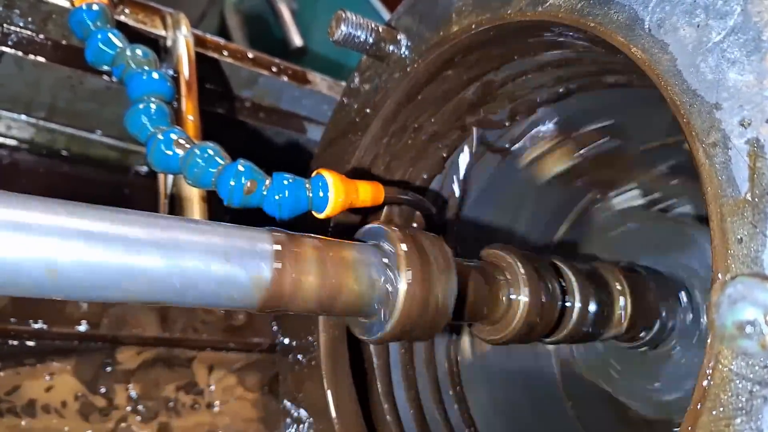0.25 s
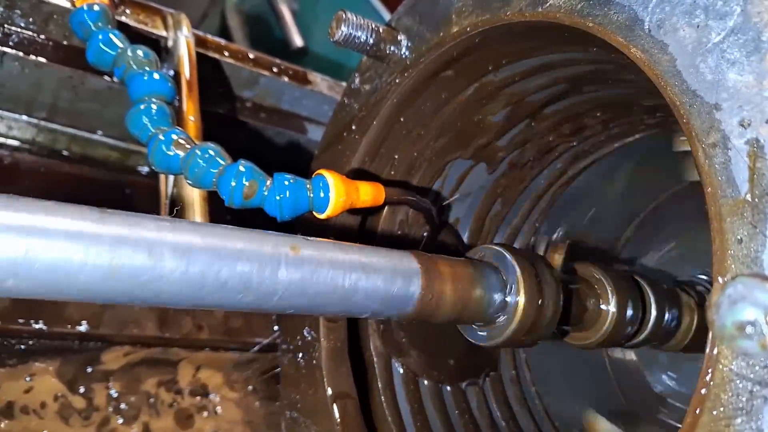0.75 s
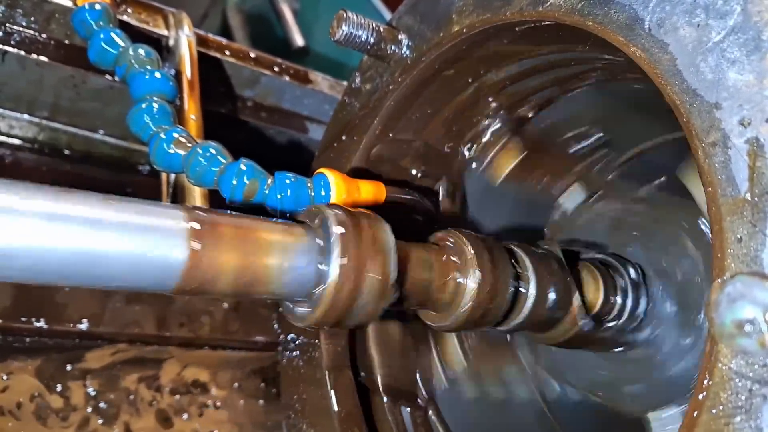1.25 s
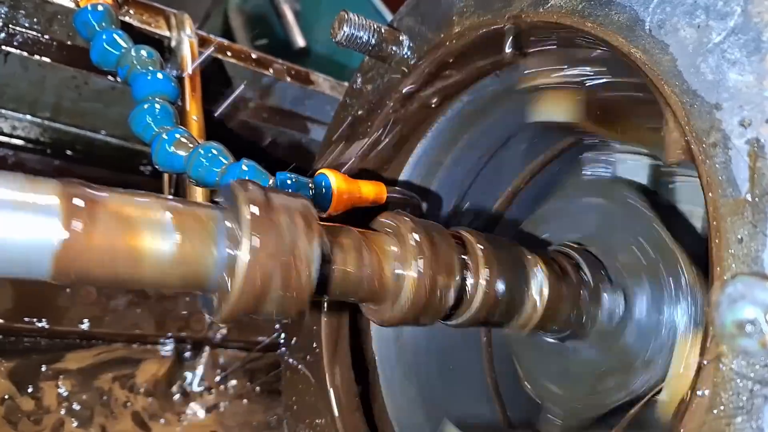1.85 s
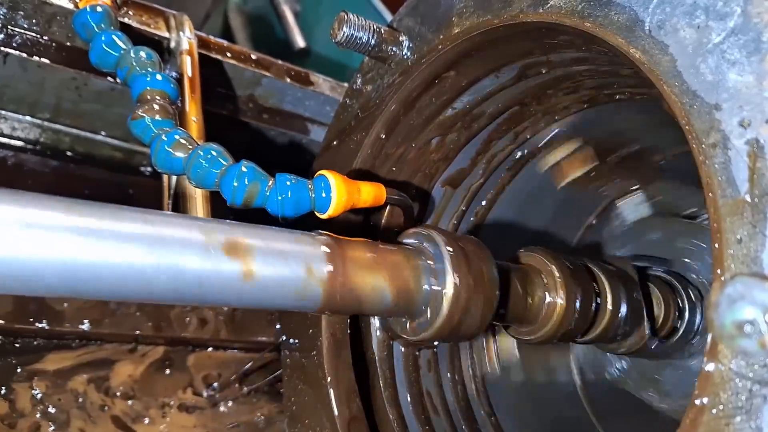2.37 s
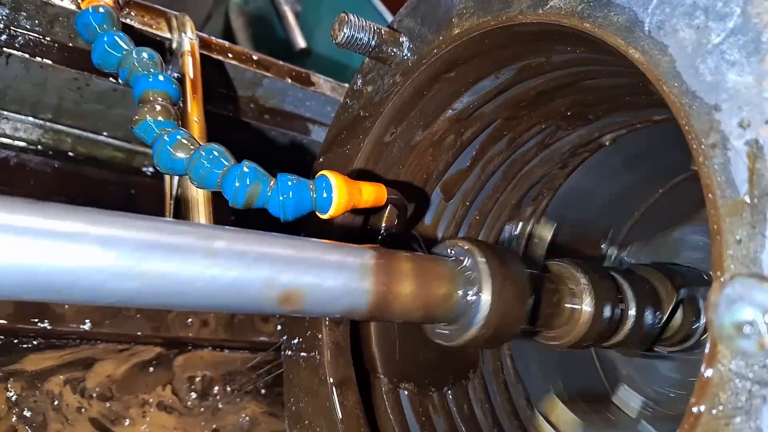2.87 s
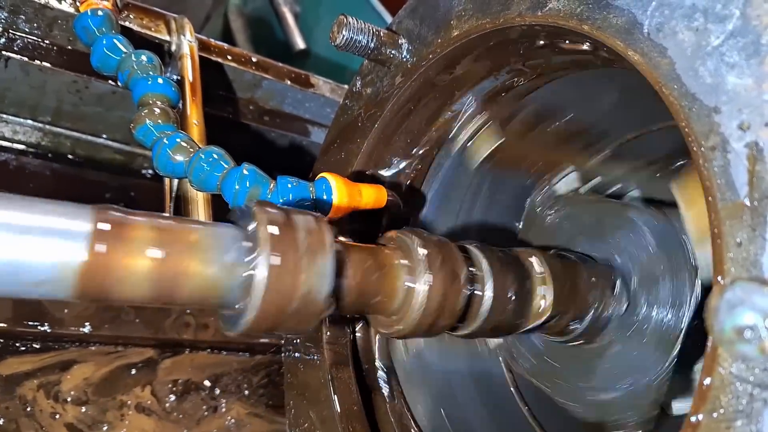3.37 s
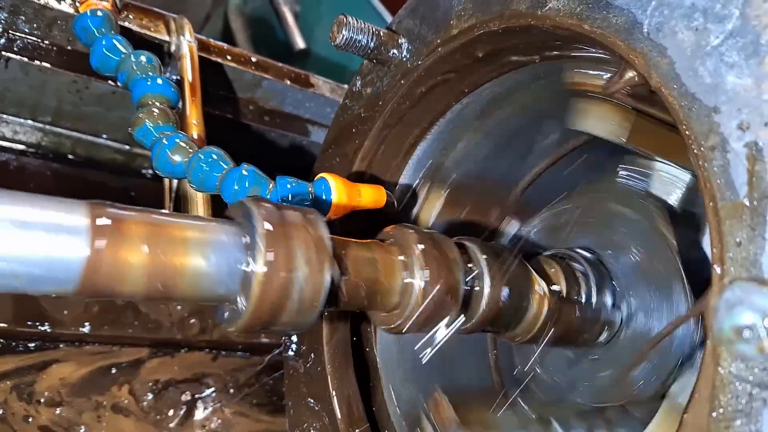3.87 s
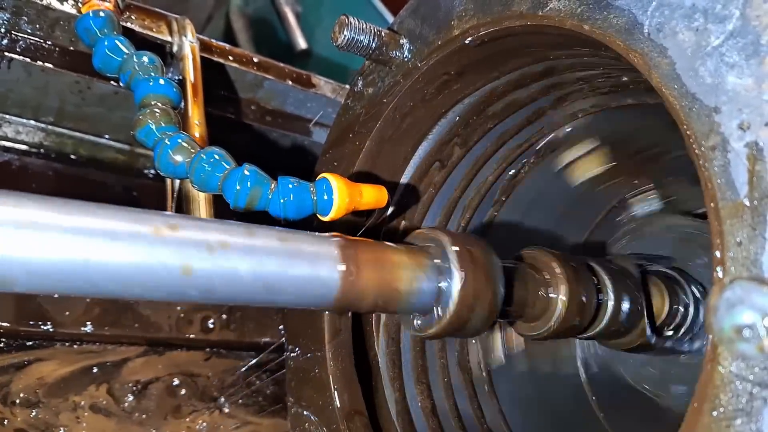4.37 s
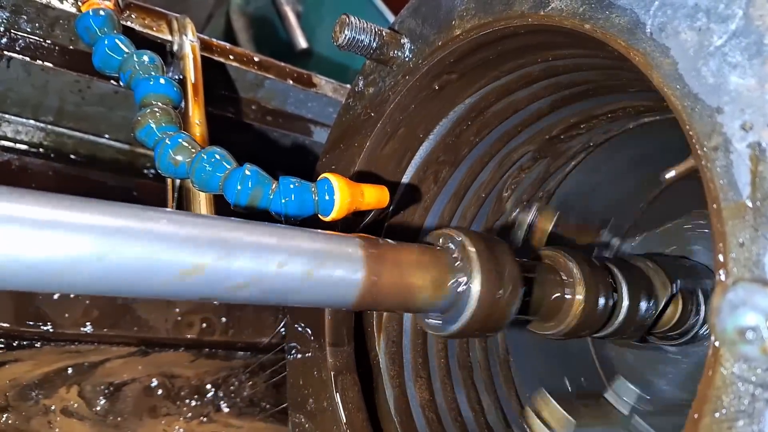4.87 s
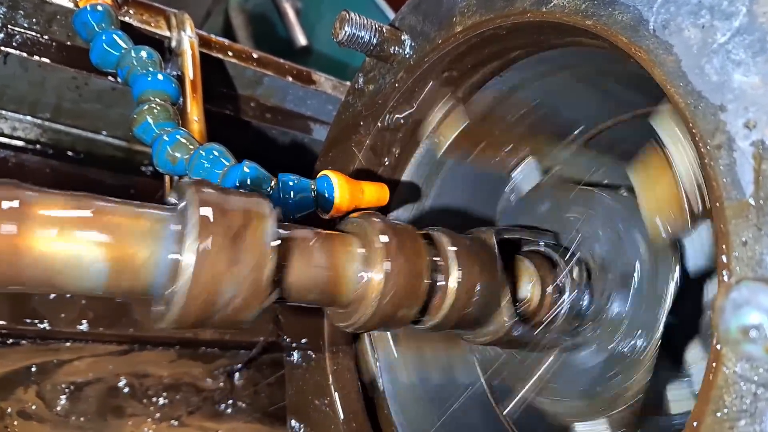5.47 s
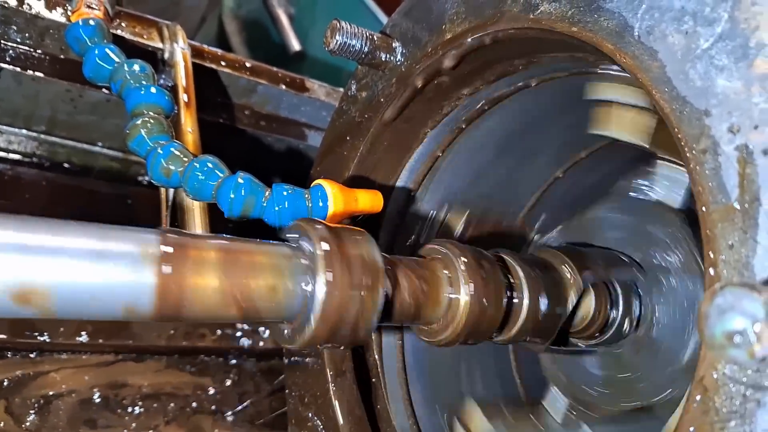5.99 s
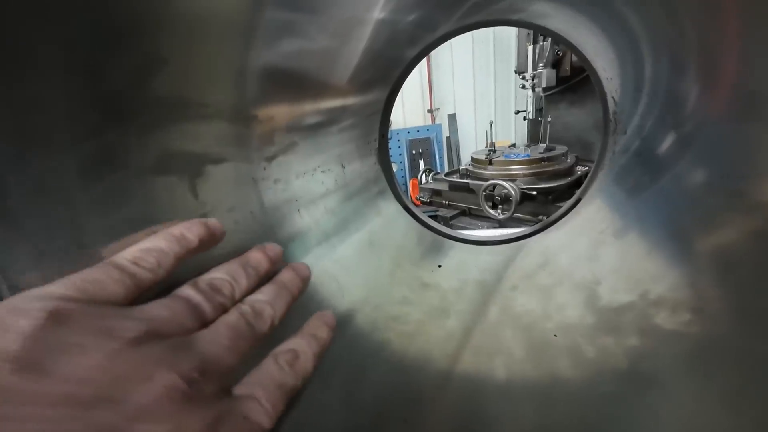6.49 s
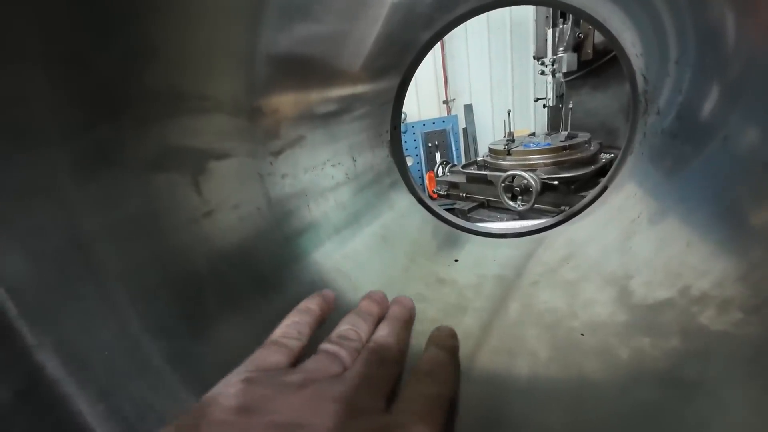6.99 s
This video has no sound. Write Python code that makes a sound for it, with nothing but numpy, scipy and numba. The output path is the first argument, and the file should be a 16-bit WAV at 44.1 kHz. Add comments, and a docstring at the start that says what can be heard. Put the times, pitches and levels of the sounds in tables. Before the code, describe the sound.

A steady mains-like motor hum sits under dense wet grinding noise and a thin high valve hiss, heard very close and wide. Each reversal clunks through the frame; stone holders tick and scrape, joints knock dully, oil spatters. Another machine's drone and rising whine end after a second and a half. Finally a hard cut leaves soft distant room murmur and a brief airy skin swish, in mono.

```python
"""Machine shop: a hone spins and strokes in an oil-flooded iron cylinder, heard close by on two microphone ports.
The motor hums at twice the mains; grit and oil are banded noise that also rings cylinder and frame.
The stroke valve hisses as narrow noise and clunks at reversals; loose parts tick and knock as ringing modes.
A neighbouring machine drones, whines and stops. Then a cut to the quiet shop, in mono:
fingertips slide along the finished bore, as resonant noise over a distant murmur."""
import sys
import numpy as np
from scipy import signal
from scipy.fft import rfft, irfft, next_fast_len
from scipy.io import wavfile
from scipy.ndimage import uniform_filter1d
from numba import njit

SR = 44100
rng = np.random.default_rng(int(sys.argv[2]) if len(sys.argv) > 2 else 0)


def store_pcm(level_fs):
    """Save levels as 16-bit WAV."""
    pcm = np.round(np.clip(level_fs, -1, 1) * 32767).astype(np.int16)
    wavfile.write(sys.argv[1], SR, np.atleast_2d(pcm).T)


N = 319264
T = np.arange(N) / SR
M = next_fast_len(N)
F = np.fft.rfftfreq(M, 1 / SR)
CUT_S = 6.110
LOW_PAN_DB = 4.4  # left minus right, for hum, drone, whine and rumble


def undb(db):
    """Amplitude factor of a level in dB."""
    return 10 ** (np.asarray(db) / 20)


def curves(table):
    """Columns against time, straight between rows."""
    s, *columns = np.transpose(table)
    return [np.interp(T, s, c) for c in columns]


def spectra(table):
    """Columns against log frequency, straight between rows."""
    hz, *columns = np.transpose(table)
    return [np.interp(np.log(F + 1), np.log(hz), c) for c in columns]


def unit(x):
    """Scale to rms 1."""
    return x / np.sqrt(np.mean(x ** 2))


def walk(rate_hz):
    """Random levels held 1 / rate_hz and slewed twice, rms 1."""
    hold = int(SR / rate_hz)
    steps = np.repeat(rng.standard_normal(N // hold + 1), hold)
    slewed = uniform_filter1d(uniform_filter1d(steps, hold), hold)
    return unit(slewed[:N])


@njit
def svf(x, hz, width_hz):
    """State-variable band-pass with a moving centre and width, gain 1 at the centre."""
    y, band, low = np.empty(len(x)), 0., 0.
    for i in range(len(x)):
        g = np.tan(np.pi * hz[i] / SR)
        damping = width_hz[i] / hz[i]
        v = (band + g * (x[i] - low)) / (1 + g * (g + damping))
        band = 2 * v - band
        low = low + 2 * g * v
        y[i] = damping * v
    return y


def rung(hz, width_hz):
    """Noise through one resonance, rms 1."""
    return unit(svf(rng.standard_normal(N), hz + 0 * T, width_hz + 0 * T))


def tone(hz, waver_rad, rate_hz):
    """Sine with a wandering phase, rms 1."""
    return np.sqrt(2) * np.sin(2 * np.pi * hz * T + waver_rad * walk(rate_hz))


def ports(x, left_db, right_db):
    """Levels at the two ports, without lag."""
    return undb([[left_db], [right_db]]) * x


def panned(x, pan_db):
    """Both ports, left minus right = pan_db."""
    return ports(x, pan_db / 2, -pan_db / 2)


def late(hz):
    """Phase turn at the right port: long waves reach both together, short ones the left first."""
    lag_s = 24 / 44100  # in full from 1300 Hz up
    return np.exp(-2j * np.pi * hz * lag_s * np.clip(hz / 1300, 0, 1) ** 2)


def stroke():
    """Hum dB, hum phase rad, rasp dB and hiss dB over one stroke in and out, repeated."""
    period_s, at_mouth_s = 1.975, 1.646
    # Each row: seconds after turning at the mouth, hum in dB, hum phase in rad, rasp swing in dB,
    # hiss swing in dB.
    stroke_points = [(0, -19.5, -0.026, 1.5, .5), (.25, -20.5, -0.076, -0.5, -1),
                     (.37, -24, 0.0024, -2, -1.5), (.5, -23.5, -0.025, -1, -1.5),
                     (.62, -23.5, 0.36, -1.5, -1.5), (.76, -28, 0.9, -2, -2), (.93, -25.5, 0.26, -1, -1),
                     (1.05, -27, 0.3, 1.5, 0), (1.15, -26.5, .1, 0, -0.5), (1.3, -27, -0.38, -0.5, -1),
                     (1.42, -28, 1, -1.5, -0.5), (1.55, -27.5, 0.39, -1, -1.5),
                     (1.7, -24.5, 0.43, -1, -0.5), (1.79, -21, -0.14, -.5, -.5)]
    s, *columns = np.transpose(stroke_points)
    return [np.interp(T - at_mouth_s, s, c, period=period_s) for c in columns]


def add(out, s, peak_db, modes, rattle_s, rattle, pan_db):
    """A blow, then bounces of independent strength at each port, ring (Hz, dB, t60 s, rise s) modes."""
    bounces_per_s = 500
    t = T[:SR // 3]
    bounces = rng.random(len(t)) < bounces_per_s / SR
    blow = bounces * rng.standard_normal((2, len(t))) * np.exp(-t / rattle_s)
    blow *= rattle / np.sqrt(rattle_s * bounces_per_s / 2)
    blow[:, 0] = 1
    ring = 0
    for hz, db, t60_s, rise_s in modes:
        envelope = (1 - np.exp(-t / rise_s)) * 1000 ** (-t / t60_s)
        ring = ring + undb(db) * envelope * np.sin(2 * np.pi * hz * t + rng.standard_normal())
    x = signal.fftconvolve(blow, ring[None], axes=1)[:, :len(t)]
    x = undb(peak_db) * x / np.abs(x).max()
    i = int(s * SR)
    out[:, i:i + len(t)] += panned(x, pan_db)


def motor():
    """Magnetic hum, louder with the head near the mouth; the fundamental shakes once a rotor turn."""
    hum_hz, start_rad = 120.04, .7
    rotor_hz, rotor_depth, waver = 26.7, .07, .06
    grows_db_per_s, wander_db, dip_s = .3, .8, .018
    # Each row: multiple of the hum, mean level in dB against the fundamental.
    overtones = [(2, -20.5), (3, -31), (4, -34)]
    # Brief dips on the way out. Each row: centre in seconds, depth in dB.
    dips = [(1.025, -16), (3.03, -12), (5.005, -10)]
    hum_db, turn_rad = stroke()[:2]
    hum_db = hum_db + grows_db_per_s * (T - CUT_S / 2) + wander_db * walk(9)
    for s, depth_db in dips:
        hum_db = hum_db + depth_db * np.exp(-((T - s) / dip_s) ** 2)
    phase = 2 * np.pi * hum_hz * T + start_rad + turn_rad + 0.08 * walk(8)
    depth = rotor_depth * (1 + .5 * walk(2.37))
    shake = 1 + depth * np.sin(2 * np.pi * rotor_hz * T) + waver * walk(30)
    hum = np.sin(phase) * shake
    for k, db in overtones:
        hum = hum + undb(db + 1.6 * walk(8)) * np.sin(k * phase)
    return panned(np.sqrt(2) * undb(hum_db) * hum, LOW_PAN_DB)


def neighbour():
    """Another machine winds down: its drone sags while a whine grows, then all stops; a low rumble fades later."""
    drone_hz, drone_start_db, sag_from_s, sag_db_per_s = 73.4, -34, 0.89, -16
    whine_hz, idle_db, whine_from_s, whine_start_db, whine_db_per_s = 209.8, -46.5, 0.86, -40, 6.5
    murmur_hz, murmur_width_hz, murmur_db, murmur_pan_db = 444, 530, -41.5, -2
    stops_s, stop_fade_s = 1.47, 0.067
    rumble_hz, rumble_width_hz, rumble_db, rumble_ends_s, rumble_fade_s = 48, 20, -47, 3.0, .3
    # Steady lines in the murmur. Each row: frequency in Hz, level in dB.
    lines = [(283, -50), (390, -52), (510, -49)]
    drone_db = drone_start_db + sag_db_per_s * np.maximum(T - sag_from_s, 0)
    growing_db = whine_start_db + whine_db_per_s * (T - whine_from_s)
    whine_db = uniform_filter1d(np.where(T < whine_from_s, idle_db, growing_db), SR // 20)
    drone = undb(drone_db) * tone(drone_hz, .15, 5.2)
    whine = undb(whine_db) * tone(whine_hz, .15, 5.0)
    murmur = undb(murmur_db) * rung(murmur_hz, murmur_width_hz)
    for hz, db in lines:
        murmur += undb(db) * tone(hz, .3, 6)
    rumble = undb(rumble_db) * rung(rumble_hz, rumble_width_hz)
    rumble *= np.clip((rumble_ends_s - T) / rumble_fade_s, 0, 1)
    running = np.clip((stops_s - T) / stop_fade_s, 0, 1)
    low = running * (drone + whine) + rumble
    return panned(low, LOW_PAN_DB) + panned(running * murmur, murmur_pan_db)


def grit():
    """Dense grit and oil noise in narrow bands: all follow the stroke, each flickers alone."""
    hiss_from_hz = 2830  # rasp blends into hiss over the octave below
    spacing_octaves = .4
    # Noise at the ports before the stroke's swing. Each row: frequency in Hz, left in dB per Hz,
    # right in dB per Hz, likeness of the ports 0-1.
    machine = [(22, -80, -84, .97), (48, -62, -67, 0.83), (140, -56, -65.5, 0.96), (306, -64.5, -63.5, 1),
               (644, -70.5, -68, 0.3), (990, -71.5, -72, 0), (1960, -69.5, -61.5, 0.45),
               (2530, -67, -64.5, 0), (3440, -66.5, -60, 0.04), (4670, -66.5, -66, 0.17),
               (5430, -64.5, -62.5, 0.08), (7870, -68.5, -66.5, 0.17), (10400, -74, -73, 0.02),
               (12700, -75.5, -67, 0), (15800, -67, -67, .35)]
    left_db, right_db, like = spectra(machine)
    like = np.clip(like, 0, 1)
    common, own_left, own_right = rfft(rng.standard_normal((3, M))) * np.sqrt(SR / 2)
    left = undb(left_db) * (np.sqrt(like) * common + np.sqrt(1 - like) * own_left)
    right = undb(right_db) * (np.sqrt(like) * common * late(F) + np.sqrt(1 - like) * own_right)
    both = np.array([left, right])
    rasp_db, hiss_db = stroke()[2:]
    bite = walk(12)  # shared by all hiss bands
    out = 0
    for hz in 25 * 2 ** np.arange(0, 10, spacing_octaves):
        offset = np.clip(np.log2(F / hz + 1e-9) / spacing_octaves, -1, 1)
        band = np.cos(np.pi / 2 * offset) ** 2
        high = np.clip(np.log2(hz / hiss_from_hz) + 1, 0, 1)
        band_rasp_db = rasp_db + 1.98 * walk(14)
        band_hiss_db = hiss_db + 0.69 * bite + 0.91 * walk(18)
        db = (1 - high) * band_rasp_db + high * band_hiss_db
        out = out + undb(db) * irfft(band * both, M)[:, :N]
    return out


def body():
    """The rasp rings cylinder and frame, each mode coming and going."""
    # Each row: frequency in Hz, width in Hz, left in dB, right in dB, before the rasp's swing.
    ringing = [(282.5, 10.5, -48.5, -49), (393, 5, -61, -62), (438, 13, -54, -49.5), (505, 5.4, -50, -54),
               (566, 13, -65, -49), (850, 28, -47.5, -50), (1180, 35, -49.5, -48), (1515, 23, -42.5, -48.5),
               (1779, 39, -47.5, -52), (3530, 240, -53, -45)]
    rasp_db = stroke()[2]
    out = 0
    for hz, width_hz, left_db, right_db in ringing:
        mode = undb(rasp_db + 2.07 * walk(5.94)) * rung(hz, width_hz)
        out = out + ports(mode, left_db, right_db)
    return out


def valve():
    """The jet changes colour with the direction; each reversal clunks through the frame."""
    switch_share = 0.76  # of the jet that changes colour on the way out
    clank_rattle, thud_rattle = .9, 1.3  # bounces against the first blow
    # Jet going in, then coming out. Each row: frequency in Hz, width in Hz, left in dB, right in dB.
    jet_in = [(11970, 640, -56, -37.5), (12950, 670, -41, -45), (13900, 900, -44, -46)]
    jet_out = [(14400, 500, -55, -51), (15300, 600, -45, -44)]
    # Each row: start in seconds, clank peak in dB, thud peak in dB, rattle decay in seconds, at the deep end or not.
    reversals = [(.670, -14, -20, 0.028, True), (1.646, -12.5, -19, .055, False),
                 (2.657, -13.5, -17.5, 0.036, True), (3.621, -14, -19.5, .06, False),
                 (4.630, -11.5, -18.5, 0.044, True), (5.595, -13, -18.5, .09, False)]
    # Modes of the valve block, then of the frame, which answers later. Each row: frequency in Hz,
    # relative dB at the deep end, relative dB at the mouth, t60 in seconds, rise in seconds.
    clank_modes = [(1464, -6, -3.5, 0.066, .001), (1603, -2.5, 0.5, 0.06, 0.00084),
                   (1702, 3.5, -2.5, 0.062, 0.0009), (1802, -1.5, -0.5, 0.081, 0.00078),
                   (1999, -1, -6, 0.094, .001), (2228, -14, -5, 0.079, 0.0013),
                   (2358, -10, -6.5, 0.072, 0.0013)]
    thud_modes = [(246, -5.5, -16, .07, 0.0051), (399, -11, -11, .06, .006),
                  (576.5, -0.5, -1.5, 0.1, 0.013), (646, -11, 0.5, .07, 0.01),
                  (740, -18, -7, 0.059, 0.0078), (825, -4.5, -6, 0.056, 0.0075),
                  (932, -4, 2.5, 0.063, 0.006), (1024, -12, -1.5, 0.068, 0.0086),
                  (1142, -7, -2, 0.069, 0.0064)]

    def at_end(modes, deep):
        """Modes with the levels of one end of the stroke."""
        return [(hz, deep_db if deep else mouth_db, t60_s, rise_s)
                for hz, deep_db, mouth_db, t60_s, rise_s in modes]

    outward = np.zeros(N)
    out = np.zeros((2, N))
    for s, clank_db, thud_db, rattle_s, deep in reversals:
        outward[int(s * SR):] = switch_share * deep
        add(out, s, clank_db, at_end(clank_modes, deep), rattle_s, clank_rattle, -3)
        add(out, s, thud_db, at_end(thud_modes, deep), rattle_s, thud_rattle, -1)
    outward = uniform_filter1d(outward, int(.12 * SR))
    for jets, share in ((jet_in, 1 - outward), (jet_out, outward)):
        for hz, width_hz, left_db, right_db in jets:
            out += ports(share * rung(hz, width_hz), left_db, right_db)
    return out


def head():
    """Stone holders tick and scrape, shaft joints knock dully, oil flung off the head splashes."""
    loose_per_s, loose_spread_db = 12, 7
    loose_knock_db, loose_tick_db = -27, -23  # loudest of the fainter blows that fall at random
    splash_rise_s = 0.013
    # Each row: start in seconds, peak in dB, left minus right in dB, scrape decay in seconds, scrape share.
    ticks = [(.36, -23, -5, .02, .6), (.772, -22, -4, .02, .5), (1.267, -24, -3, .015, .5),
             (1.663, -21, -8, .05, 1.2), (1.783, -16.5, -7, 0.027, 1.5), (3.24, -26, -5, .02, .6),
             (3.564, -12, -8, 0.035, 0.33), (3.685, -32, -8, .02, .5), (3.77, -23.5, -6, .05, 1.2),
             (4.372, -22, -6, .02, .5), (5.341, -20.5, -4, .03, .6), (5.403, -25, -3, .01, .5),
             (5.569, -25, -7, .025, .6), (5.785, -19, -5, .05, 1.3)]
    # Each row: start in seconds, peak in dB, left minus right in dB.
    knocks = [(.574, -20, -3), (.792, -18.5, 4), (1.447, -20, 3), (1.846, -24, 0), (1.882, -26, 0),
              (2.577, -24, 3), (2.893, -26, 0), (2.930, -27, 0), (4.895, -28, -2), (5.436, -19.5, 0),
              (5.653, -17, 4), (5.80, -25, -1)]
    # Modes of a tick, then of a knock. Each row: frequency in Hz, relative dB, t60 in seconds.
    tick_modes = [(3150, -1.5, 0.042), (3435, 2, 0.031), (3650, -1.5, 0.043), (5300, -6, 0.022)]
    knock_modes = [(335, 2, 0.024), (472, -2.5, 0.034), (618, -1.5, 0.031), (855, 2.5, 0.034),
                   (1160, 0.5, 0.03), (1490, -11, 0.018)]
    # Each row: start in seconds, rms at its height in dB, left minus right in dB.
    splashes = [(1.845, -36, 0), (2.34, -34, -4), (3.555, -28, -3), (3.825, -29, -1), (4.675, -34, 0),
                (4.915, -30.5, -5), (5.40, -31, -1), (5.80, -26.5, -3)]
    tick_modes = [(*mode, .001) for mode in tick_modes]  # rise in seconds
    knock_modes = [(*mode, .001) for mode in knock_modes]
    all_ticks, all_knocks = list(ticks), list(knocks)
    chance = rng.random((100, 4))
    times = np.cumsum(-np.log(1 - chance[:, 0]) / loose_per_s)
    for s, (_, faint, side, kind) in zip(times, chance):
        if s >= CUT_S:
            break
        db, pan_db = -loose_spread_db * faint, 8 * side - 6
        if kind < .5:
            all_ticks.append((s, loose_tick_db + db, pan_db, .02, .7))
        else:
            all_knocks.append((s, loose_knock_db + db, pan_db))
    out = np.zeros((2, N))
    for s, db, pan_db, scrape_s, share in all_ticks:
        add(out, s, db, tick_modes, scrape_s, share, pan_db)
    for s, db, pan_db in all_knocks:
        add(out, s, db, knock_modes, .008, .6, pan_db)
    spray = np.array([rung(5900, 14000), rung(6300, 14000)])
    for s, db, pan_db in splashes:
        age = np.maximum(T - s, 0) / splash_rise_s
        out += panned(undb(db) * age * np.exp(1 - age) * spray, pan_db)
    return out


def quiet_shop():
    """Distant shop murmur as shaped noise, a far hum, and noise through the bore's air modes."""
    murmur_db, hum_hz, hum_db = -52.5, 168, -64
    # Murmur spectrum. Each row: frequency in Hz, relative dB per Hz.
    shop = [(15, -50), (45, -24), (58, -6), (88, -5), (110, -13), (161, -4), (212, -4), (439, 1),
            (624, -0.5), (2160, -9), (4610, -25.5), (13600, -34), (16000, -42)]
    # Air in the bore. Each row: frequency in Hz, width in Hz, mean level in dB.
    bore = [(258, 14, -62), (314, 19, -64), (430, 25, -64)]
    shaped = irfft(rfft(rng.standard_normal(M)) * undb(spectra(shop)[0]), M)[:N]
    murmur = undb(murmur_db + .6 * walk(4.4)) * unit(shaped)
    air = sum(undb(db + 1.5 * walk(3.9)) * rung(hz, width_hz) for hz, width_hz, db in bore)
    hum = undb(hum_db + 1.7 * walk(7.7)) * tone(hum_hz, .4, 7.6)
    return murmur + air + hum


def fingertips():
    """Skin sliding on smooth iron: a squeak of moving pitch and width over a broader swish."""
    # Each row: time in seconds, squeak in dB, squeak in Hz, squeak width in Hz, swish in dB.
    fingers = [(6.11, -62, 14000, 900, -56.5), (6.2, -68, 13300, 700, -58.5), (6.24, -77, 12000, 700, -63),
               (6.3, -88, 10500, 700, -74), (6.4, -87, 13500, 2500, -92), (6.46, -77, 13800, 2500, -81),
               (6.8, -77, 13800, 2000, -81), (7.1, -78, 13500, 1980, -80), (7.24, -85, 13400, 2000, -85)]
    # Each row: frequency in Hz, width in Hz, relative dB.
    swish_bands = [(4580, 2200, 0.5), (8300, 900, -6), (11000, 4000, -15)]
    squeak_db, hz, width_hz, swish_db = curves(fingers)
    swish = sum(undb(db) * rung(band_hz, band_width_hz) for band_hz, band_width_hz, db in swish_bands)
    return undb(squeak_db) * rung(hz, width_hz) + undb(swish_db) * swish


def scene():
    """Honing on two ports, then a cut to the quiet shop in mono."""
    left, right = body() + valve() + head()
    right = irfft(rfft(right, M) * late(F), M)[:N]
    honing = motor() + neighbour() + grit() + np.array([left, right])
    before = np.clip((CUT_S - T) / 0.0013, 0, 1)
    return before * honing + (1 - before) * (quiet_shop() + fingertips())


def record(dry):
    """The recorder cuts the top with a steep low-pass."""
    top_hz = 15800
    return signal.sosfilt(signal.ellip(12, .2, 80, top_hz, fs=SR, output="sos"), dry)


dry = scene()
out = record(dry)
store_pcm(out)
```